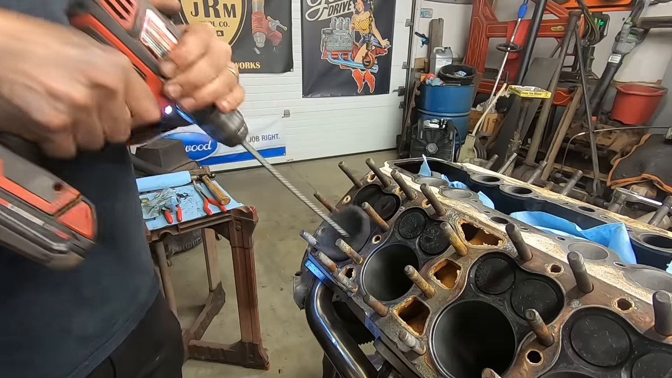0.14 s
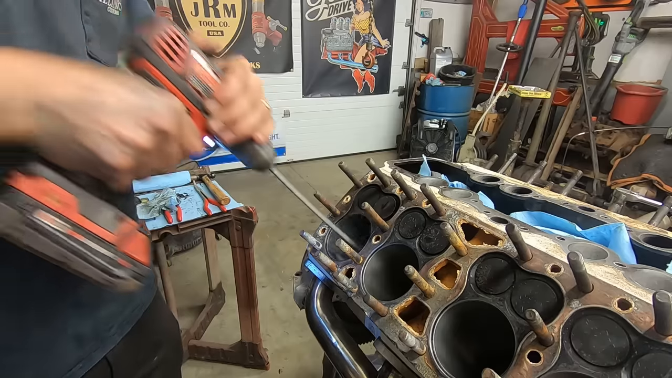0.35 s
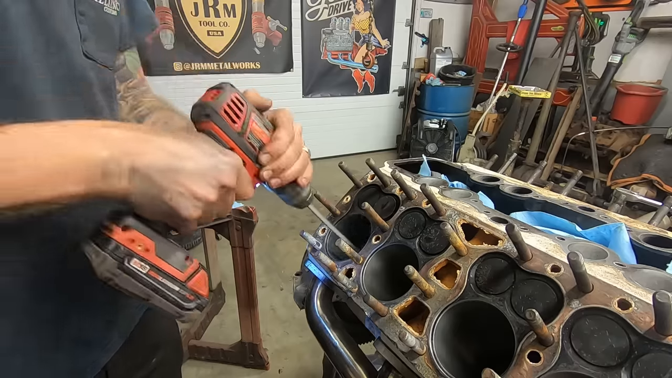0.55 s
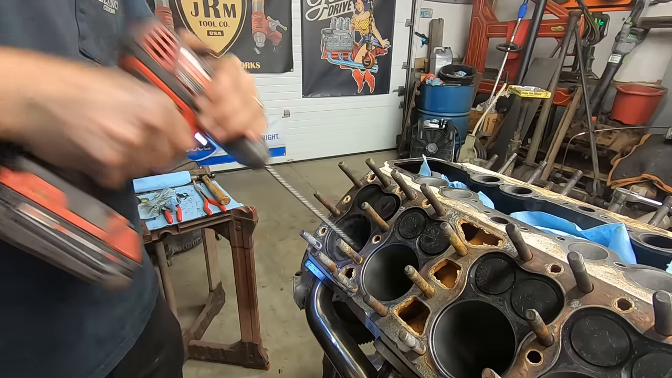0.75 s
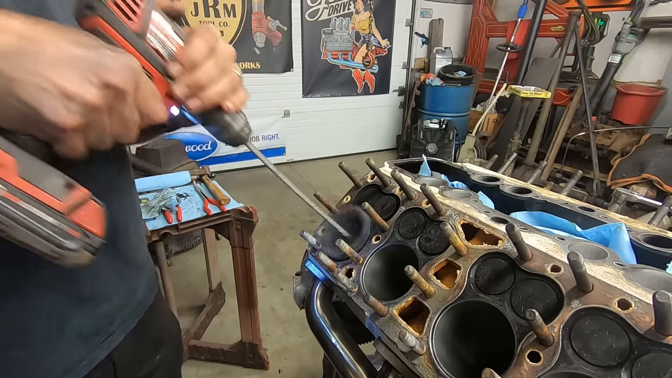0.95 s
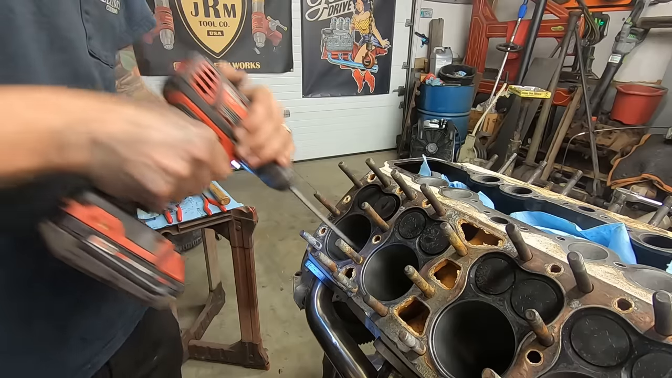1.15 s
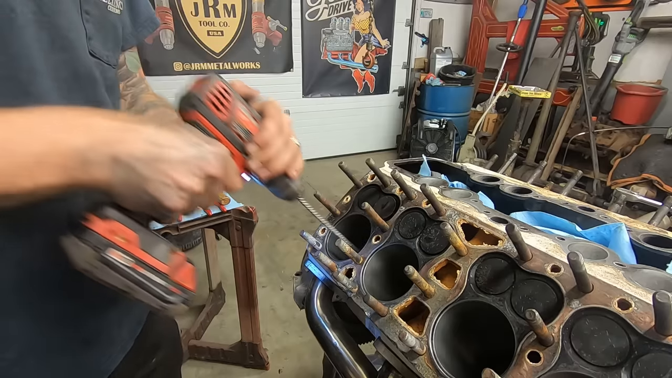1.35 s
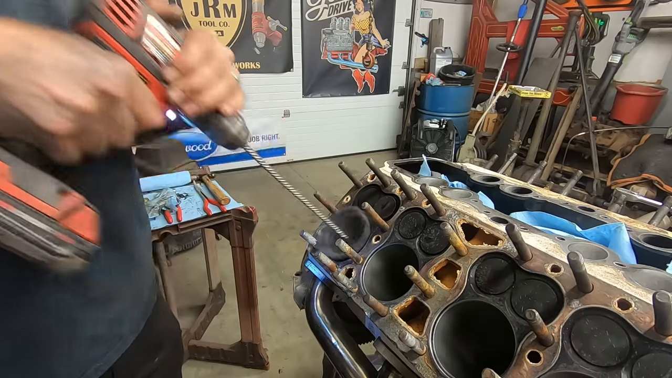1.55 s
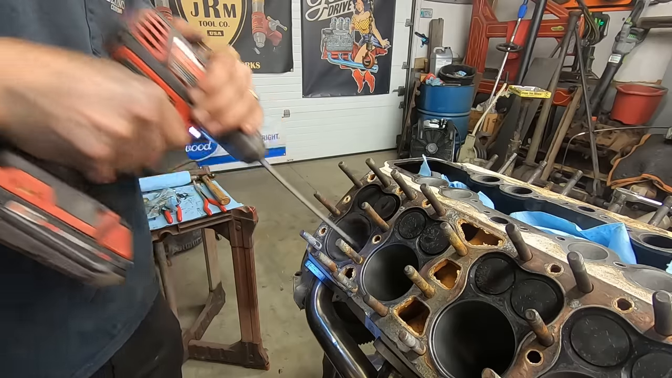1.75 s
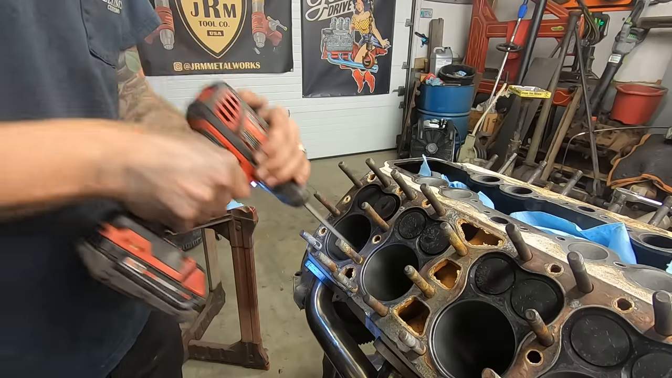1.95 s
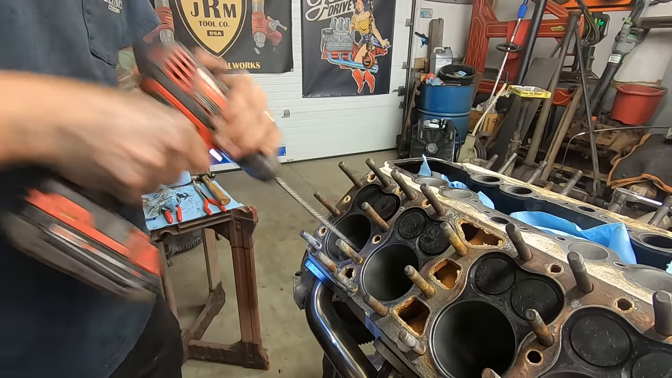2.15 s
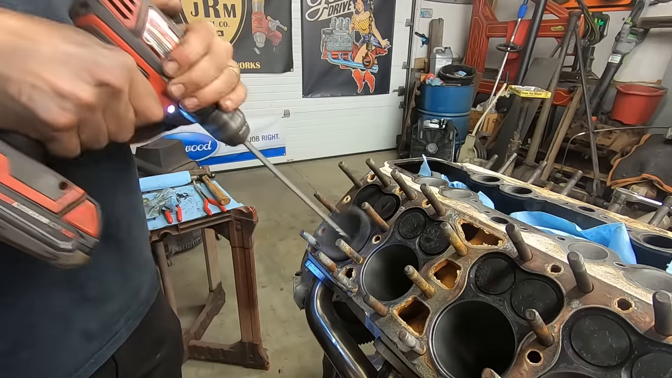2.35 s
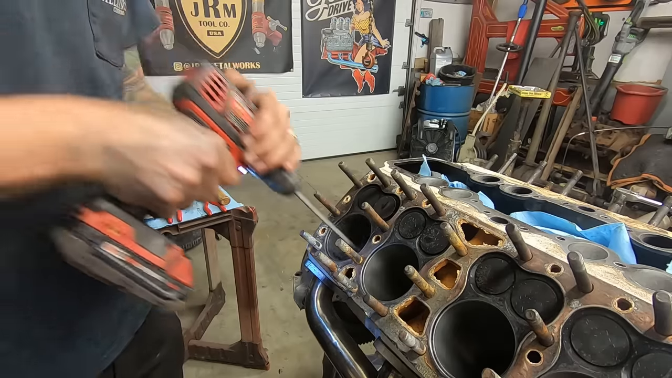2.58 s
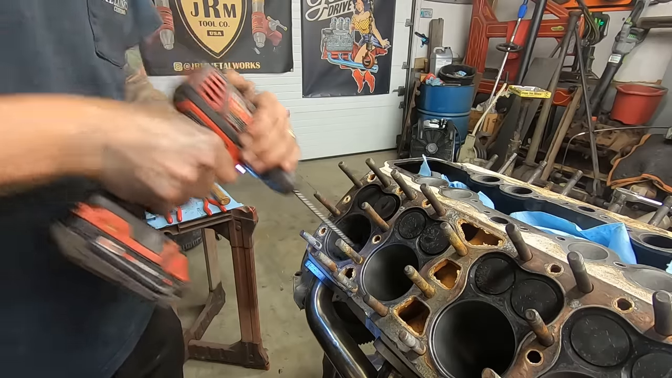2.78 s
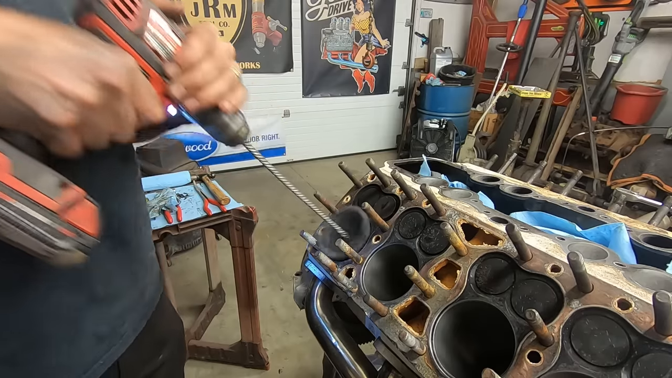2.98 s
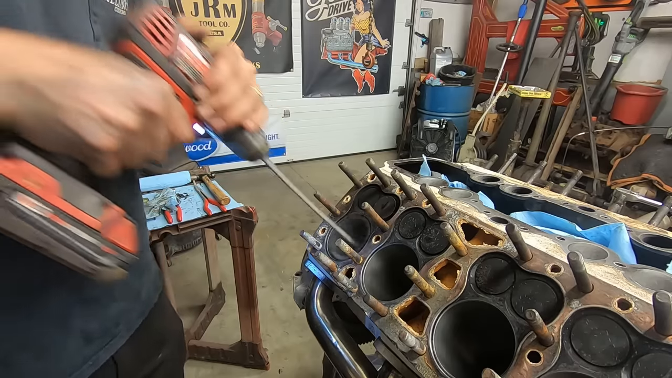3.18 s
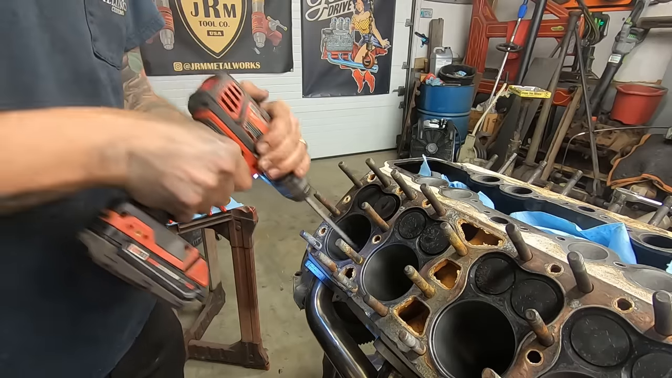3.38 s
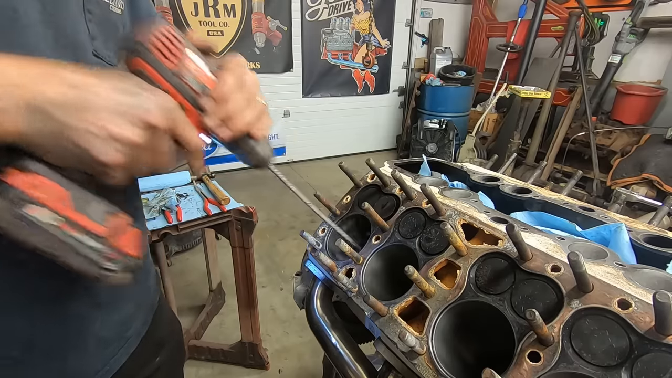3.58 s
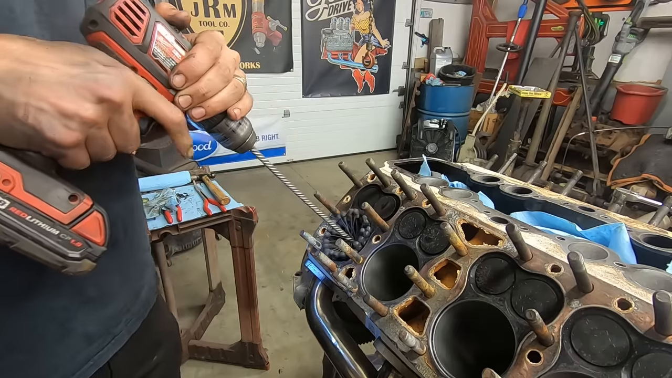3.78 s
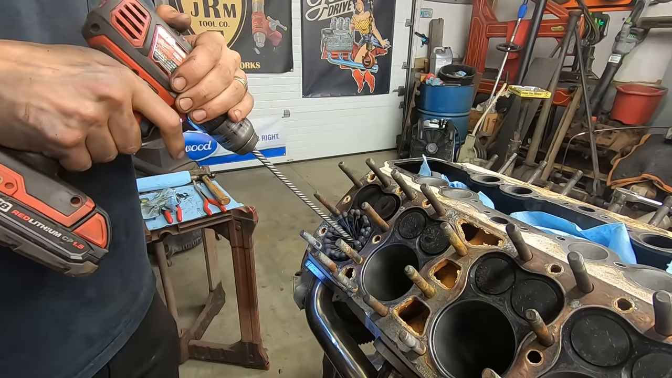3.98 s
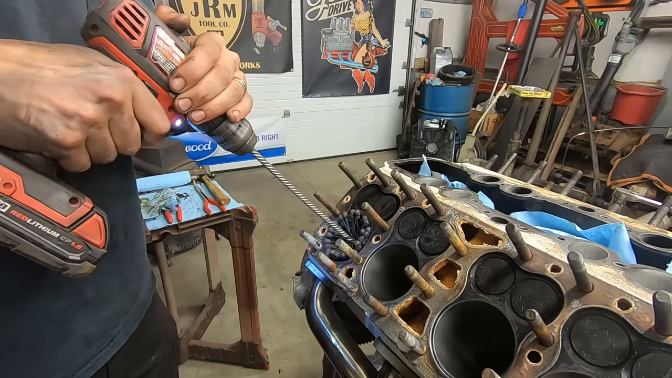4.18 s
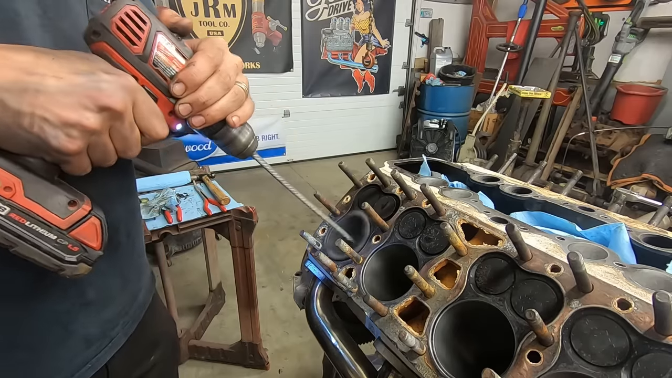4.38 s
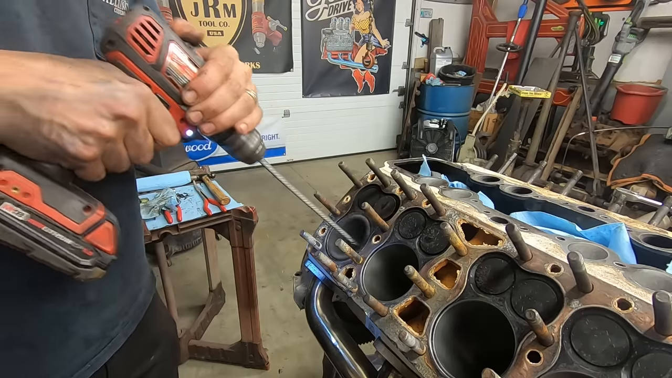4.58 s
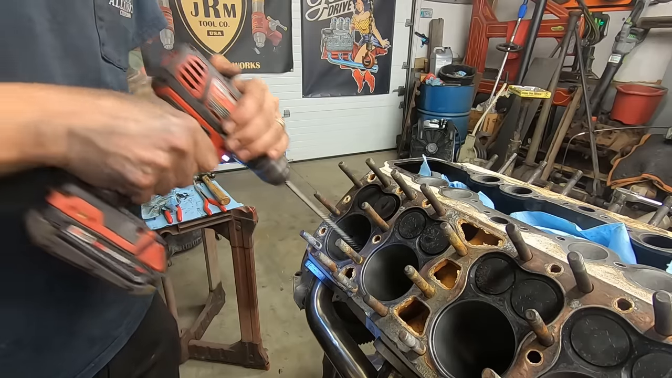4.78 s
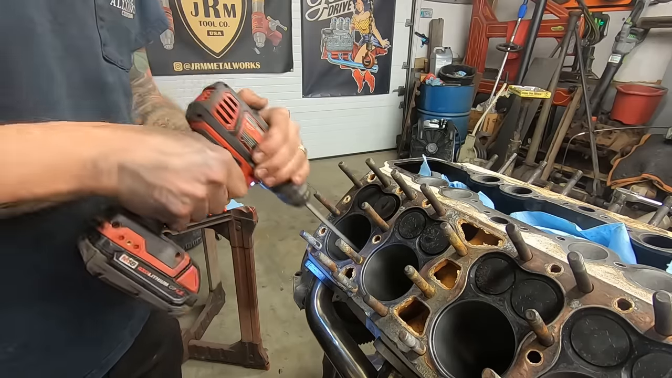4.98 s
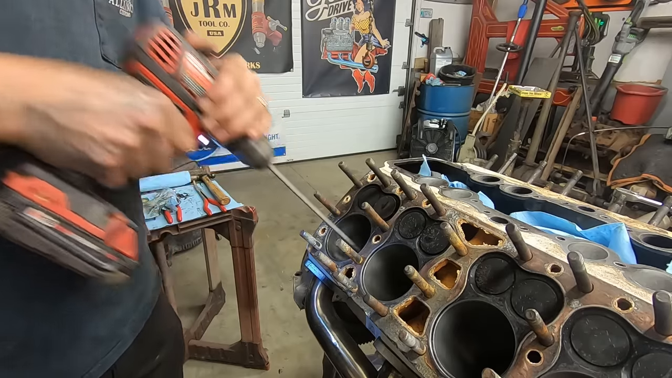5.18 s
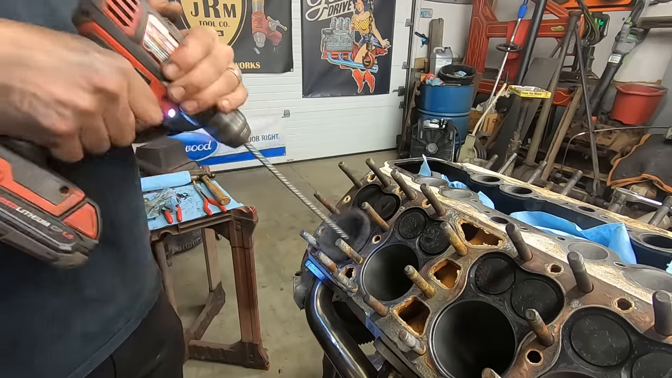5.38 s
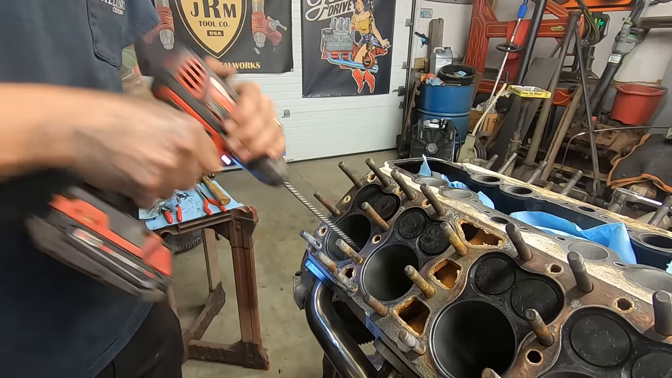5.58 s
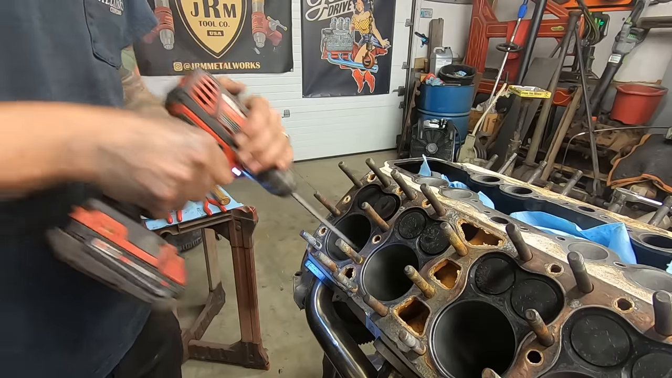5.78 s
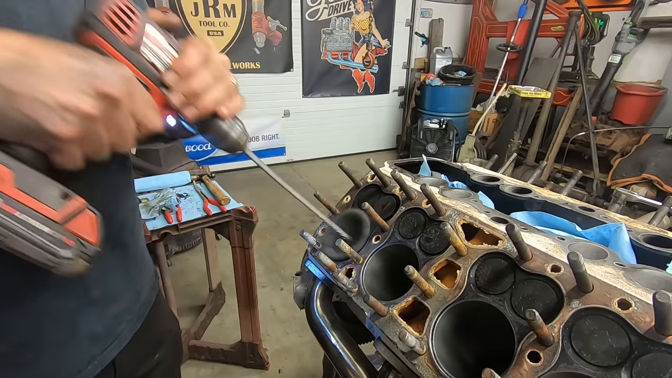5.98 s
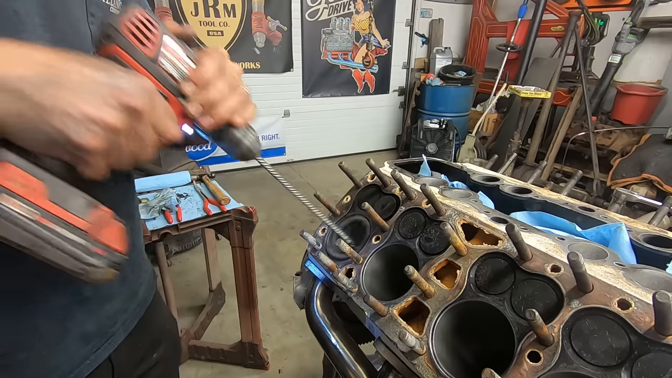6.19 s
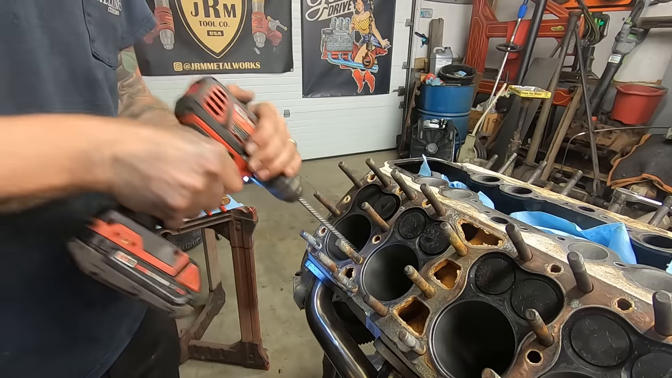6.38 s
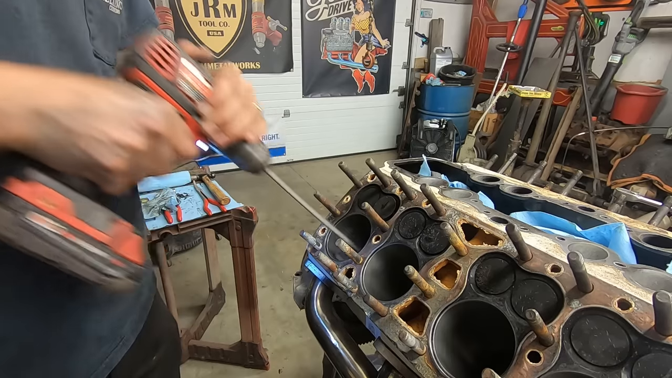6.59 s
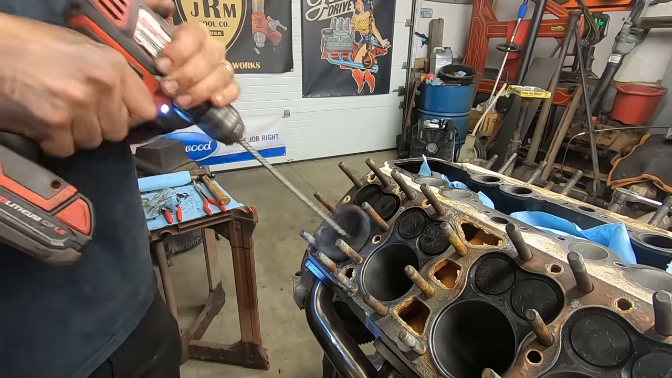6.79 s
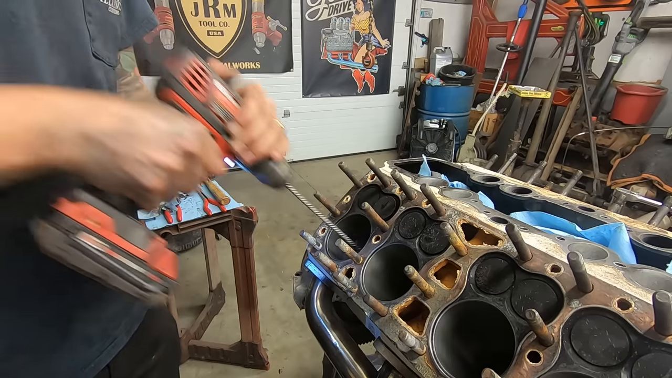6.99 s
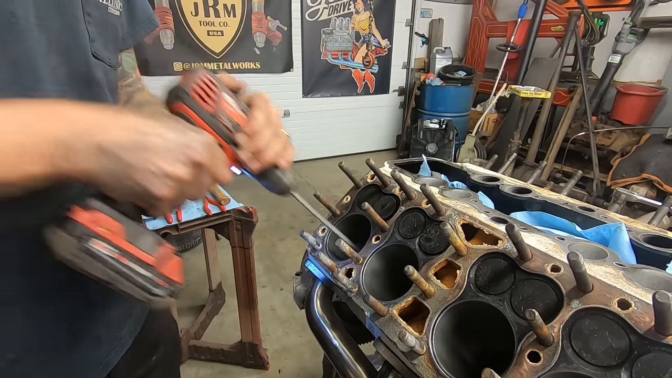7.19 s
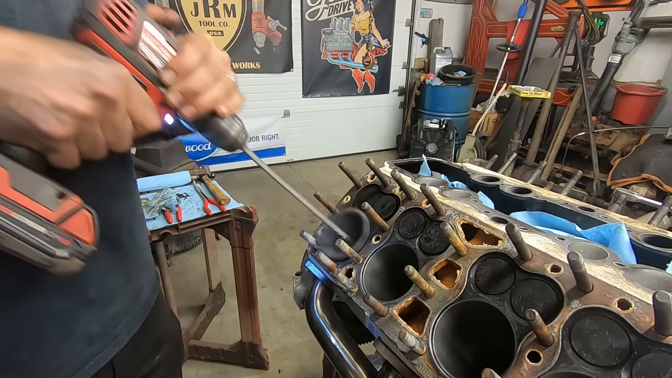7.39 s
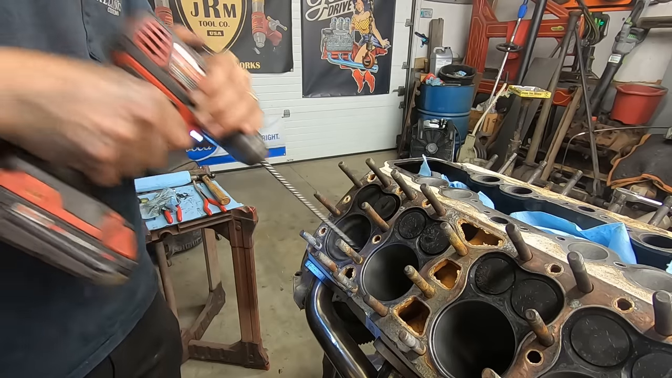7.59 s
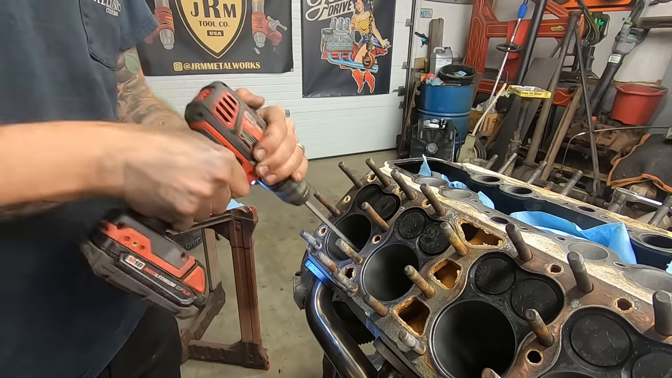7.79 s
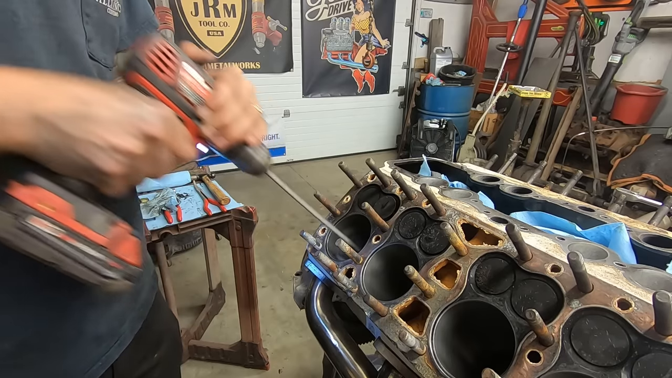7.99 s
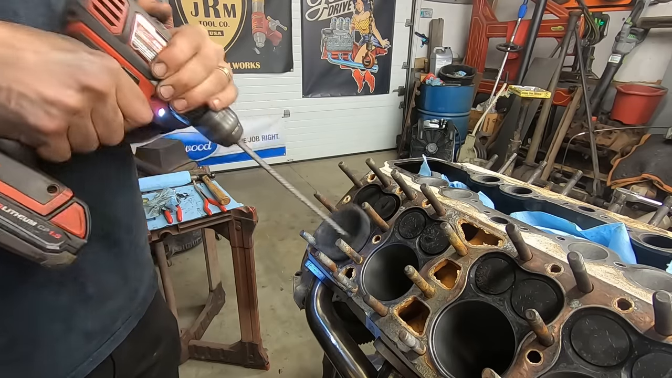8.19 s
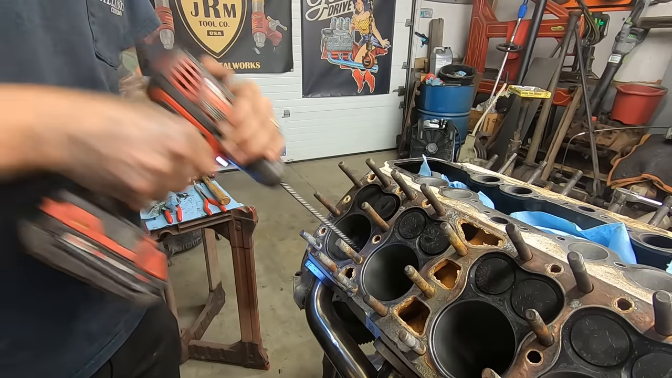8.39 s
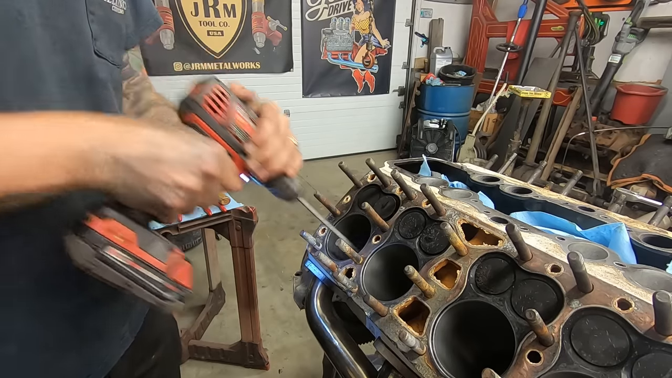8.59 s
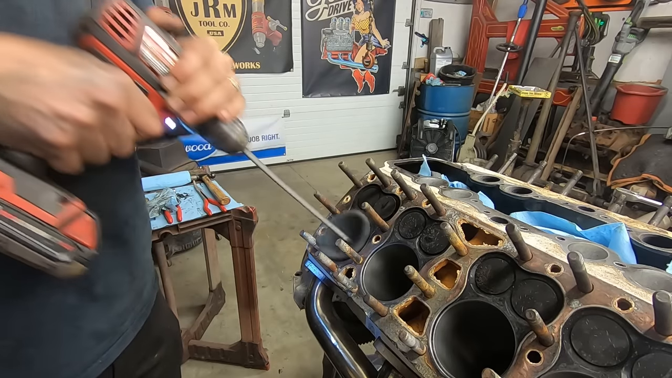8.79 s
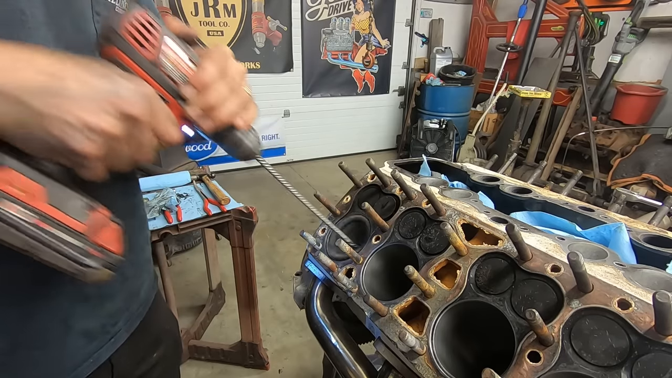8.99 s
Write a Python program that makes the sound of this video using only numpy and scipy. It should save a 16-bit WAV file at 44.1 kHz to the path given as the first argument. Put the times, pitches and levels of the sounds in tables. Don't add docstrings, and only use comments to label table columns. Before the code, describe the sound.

Close in a garage, a cordless drill is already running, its gears whining and rattling while an abrasive hone scrapes up and down an iron bore with brief high squeaks. It brakes abruptly at about 3.6 seconds, leaving low hum and hard switch clicks. At 4.4 seconds it spins up again in reverse, with ball slaps, short metallic rings and a soft low thud near 6.2 seconds.

```python
import sys
import numpy as np
from scipy import signal
from scipy.fft import rfft, irfft
from scipy.io import wavfile
from scipy.ndimage import uniform_filter1d

SR = 44100
rng = np.random.default_rng(int(sys.argv[2]) if len(sys.argv) > 2 else 0)


def gain_from_db(level_db):
    decades = np.asarray(level_db, float) / 20
    return 10 ** decades


def file_out(sig):
    cols = np.atleast_2d(sig).T
    lim = np.clip(cols, -1, 1)
    pcm = np.round(lim * 32767).astype(np.int16)
    wavfile.write(sys.argv[1], SR, pcm)


N = 399105
TIME, HZ = np.arange(N) / SR, np.fft.rfftfreq(N, 1 / SR) + 1
RATTLE_DB, RATTLE_PER_BITE = -21.5, 0.13
GRIT_DB = -14


def on_log(table):
    hz, value = np.transpose(table)
    return np.interp(np.log(HZ), np.log(hz + 1), value)


def unit(x):
    return x / np.sqrt(np.mean(x ** 2))


def colour(x, table):
    return unit(irfft(rfft(x) * gain_from_db(on_log(table)), N))


def walk(rate):
    hold = int(SR / rate)
    steps = np.repeat(rng.standard_normal(N // hold + 1), hold)
    return unit(uniform_filter1d(uniform_filter1d(steps, hold), hold)[:N])


def grains(density, spread_db):
    # (frequency [Hz], likeness [0-1])
    likeness = [(60, 0.3), (130, 0.4), (290, 0.79), (640, 0.7), (1410, 0.37), (3100, 0.97), (6820, 0.49),
                (15000, 0.05)]
    size_db = np.minimum(spread_db * rng.exponential(size=N), 8)
    hits = rng.standard_normal((2, N)) * (rng.random(N) < density / SR) * gain_from_db(size_db)
    mid, side = rfft(hits)
    alike = np.clip(on_log(likeness) + 0.033, 0, 1)
    left_right = np.array([[1], [-1]])
    return irfft(np.sqrt(1 + alike) * mid + np.sqrt(1 - alike) * side * left_right, N)


def garage_hum():
    # (frequency [Hz], level [dB per Hz])
    hum_colour = [(15, -8), (35, -4), (60, 7), (100, -20), (180, 4), (290, -24), (600, -11.5), (1500, -8.5),
                  (3000, -14), (6500, -11), (12000, -32), (15500, -55)]
    return gain_from_db(-56.5 + 1.8 * walk(3.5)) * colour(grains(SR, 0), hum_colour)


def floor_thud():
    swell = np.exp(-((TIME - 6.21) / 0.059) ** 2)
    return gain_from_db(-46) * swell * np.sin(2 * np.pi * 60 * TIME)


def room(x):
    # (frequency [Hz], time to fall 60 dB [s], level [dB])
    echo_bands = [(300, 0.77, -13.5), (1300, 0.46, -11), (3500, 0.73, -9), (6000, .8, -7.5),
                  (9000, 0.45, -6), (13000, .33, -8)]
    tail, age = 0, TIME[:SR]
    centres = [row[0] for row in echo_bands]
    for share, (hz, t60, db) in zip(np.eye(len(echo_bands)), echo_bands):
        weight = np.sqrt(on_log(np.transpose([centres, share])))
        noise = irfft(rfft(rng.standard_normal((2, N))) * weight, N)[:, :SR]
        fade = gain_from_db(-60 * age / t60) * np.clip(age / 0.029, 0, 1)
        tail = tail + gain_from_db(db) * noise * fade / np.sqrt(np.sum(fade ** 2))
    lead_in = np.concatenate([x[SR:0:-1], x])
    return signal.fftconvolve(lead_in[None], tail)[:, SR:SR + N]


def snaps(events):
    length = 8000
    out, age = np.zeros(N + length), TIME[:length]
    for s, db, hz, width_hz, t60 in events:
        edges_hz = [max(hz - width_hz / 2, 300), hz + width_hz / 2]
        band = signal.butter(3, edges_hz, "bandpass", fs=SR, output="sos")
        blow = 9.2 * (age == 0)
        burst = signal.sosfilt(band, (rng.standard_normal(length) + blow) * gain_from_db(-60 * age / t60))
        start = int(s * SR)
        out[start:start + length] += gain_from_db(db) * burst / np.abs(burst).max()
    return out[:N]


def switch_clicks():
    # (time [s], peak level [dB], centre [Hz], width [Hz], time to fall 60 dB [s])
    click_events = [(4.02, -52, 1002, 700, .02), (4.04, -59, 896, 700, .02),
                    (4.0545, -23, 6040, 3500, 0.036), (4.061, -28, 5570, 2400, .03),
                    (4.0547, -36, 10500, 6000, .03), (4.15, -29, 3500, 5500, .3),
                    (4.109, -55, 2000, 3000, 0.023), (4.135, -31, 8000, 11000, .03),
                    (4.1357, -6, 2100, 2800, 0.013), (4.137, -15, 4400, 4100, 0.013),
                    (4.142, -18.5, 2730, 4400, 0.045), (4.2978, -32, 1700, 2800, .015),
                    (4.312, -46, 2980, 3000, .015), (4.335, -48, 1800, 2500, .02),
                    (4.359, -27, 7000, 12000, .02), (4.36, -28, 3500, 5000, .12),
                    (4.393, -34, 447, 250, .06), (4.418, -30, 447, 250, .06), (4.393, -9.5, 3080, 900, .04),
                    (4.393, -20, 1170, 700, 0.029), (4.4178, -5, 3270, 2400, 0.027),
                    (4.4185, -16.5, 1240, 500, 0.038), (4.478, -16, 3000, 2000, .02),
                    (4.492, -18, 3000, 1500, .03)]
    return snaps(click_events)


def rim_slaps():
    # (time [s], peak level [dB])
    slap_events = [(1.2382, -11), (2.4686, -6.5), (3.1137, -5), (4.4521, -9), (5.5657, -7), (5.9575, -12.5),
                   (6.098, -17), (6.133, 0), (6.1674, -10), (6.213, 1), (6.2442, 0), (6.2824, 0.5),
                   (6.8951, -3.5), (7.6066, 2), (7.9908, -18)]
    return snaps([(s, db - 7, 5000, 4500, 0.015) for s, db in slap_events])


def wall_tones(events, wobble):
    out = np.zeros(N)
    drift = np.cumsum(1 + wobble * walk(200)) / SR
    for s, db, hz, length in events:
        now = slice(int(s * SR), int((s + length) * SR))
        swell = np.hanning(len(drift[now])) ** 0.31
        out[now] += gain_from_db(db - 10) * swell * np.sin(2 * np.pi * hz * drift[now])
    return out


def forward_squeaks():
    # (time [s], peak level [dB], pitch [Hz], length [s])
    squeak_events = [
        (0.996, -15, 8740, 0.027),
        (1.0675, -14, 8740, 0.03),
        (1.749, -10, 8800, 0.022),
        (3.172, -7, 8840, 0.025),
        (3.2444, -22, 8830, 0.029),
    ]
    return wall_tones(squeak_events, wobble=0.016)


def reverse_rings():
    # (time [s], peak level [dB], pitch [Hz], length [s])
    ring_events = [
        (6.146, -8, 2700, 0.048),
        (6.216, -10, 2710, 0.018),
        (6.845, -7, 2697, 0.033),
        (6.9, -9, 2686, 0.039),
        (7.545, -11, 2670, 0.029),
        (7.61, -9, 2690, .03),
        (8.305, -6, 2717, 0.033),
        (8.36, -11, 2710, 0.031),
        (8.95, -12, 2696, 0.038),
        (9.005, -8, 2730, 0.029),
    ]
    return wall_tones(ring_events, wobble=0.0028)


def grit_scrape(turn, rattle_db, treble_db):
    # (frequency [Hz], level [dB per Hz])
    grit_colour = [(1500, -29), (3000, -19), (6000, 4), (8500, 4), (10500, -3.5), (12500, -4.5),
                   (14000, -9.5), (15600, -19)]
    pressure = gain_from_db(1.5 * np.cos(turn) + 1.4 * walk(18))
    scrape = colour(grains(8000, 1.8) * pressure, grit_colour)
    return gain_from_db(rattle_db - 10 + 1.16 * (treble_db + 12.5)) * scrape


def gear_rattle(sun, turn, rattle_db):
    # (frequency [Hz], level [dB per Hz])
    rattle_colour = [(60, -70), (110, -29.5), (230, -25), (340, -21.5), (680, -13), (1370, -8),
                     (1600, -8.5), (2300, -2.5), (3800, -2.5), (5900, 0), (7000, -9), (10500, -17.5),
                     (13500, -22), (15500, -48)]
    # (frequency [Hz], width [Hz], boost [dB])
    housing = [(700, 230, 4), (1280, 240, 4), (2800, 490, 1.5), (3370, 110, 2), (4400, 170, 3),
               (5100, 250, 1.5), (6030, 460, 4), (8430, 500, 5.5)]
    knock = (1 + 0.053 * np.cos(5 * sun)) * (1 + 0.021 * np.cos(sun))
    knock = knock * gain_from_db(0.5 * np.cos(turn) + 0.43 * walk(20))
    knocks = colour(grains(20000, 1.23) * knock, rattle_colour)
    ring_db = sum(db / (1 + (2 * (HZ - hz) / width_hz) ** 2) for hz, width_hz, db in housing)
    return gain_from_db(rattle_db + 1.5) * unit(irfft(rfft(knocks) * gain_from_db(ring_db), N))


def gear_whine(sun, mesh_hz, mesh_db, swell_db, rattle_db, planet_db, multiple_db, swelling):
    multiples = (1, 2, 2.87, 3, 4, 5, 6, 8, 10.5, 11, 11.25, 11.5, 12, 14.67, 15, 19, 20, 21, 22, 22.5, 24,
                 25, 30, 33.75, 35, 36, 40, 41, 42, 50)
    whine = gain_from_db(mesh_db + 1.8 * walk(30)) * np.sin(10 * sun)
    whine += gain_from_db(swell_db + 2.6 * walk(30)) * np.sin(swelling * sun)
    pull = np.clip(uniform_filter1d(np.gradient(mesh_hz) * SR / 4000, size=2000), 0, 1)
    load = gain_from_db(rattle_db + 22) * (mesh_hz / 2400) ** 4
    for multiple, db in zip(multiples, multiple_db):
        planet = 2 < multiple < 3
        waver = 2.6 if planet else 1.3 if multiple < 9 else 2.4
        tone_db = db + 8 * pull * (multiple > 9) + planet_db * planet + waver * walk(22)
        whine += load * gain_from_db(tone_db) * np.sin(multiple * sun + 0.3 * waver * walk(30))
    return np.sqrt(2) * whine


def drill(pulled, mesh_hz, mesh_db, swell_db, rattle_db, treble_db, planet_db, multiple_db, swelling):
    running = uniform_filter1d(1. * pulled, size=600, mode="nearest")
    sun = 2 * np.pi * np.cumsum(mesh_hz * (1 + 0.00202 * walk(40))) / 10 / SR
    turn = 10 * sun / 170 + 1.8 * walk(4)
    whine = gear_whine(sun, mesh_hz, mesh_db, swell_db, rattle_db, planet_db, multiple_db, swelling)
    rattle = gear_rattle(sun, turn, rattle_db)
    return running * (whine + rattle + grit_scrape(turn, rattle_db, treble_db))


def strokes(ends, lag_s, bite_s):
    s, hz, bite_db, strain_db = np.transpose(ends)
    bottom = np.arange(len(s)) % 2
    late = s + np.take(lag_s, bottom)

    def smooth(values):
        return uniform_filter1d(np.interp(TIME, late, values), size=3000, mode="nearest")

    bites = zip(s, bite_db, np.take(bite_s, bottom))
    bite = sum(db * np.exp(-((TIME - at) / length) ** 2) for at, db, length in bites)
    return smooth(hz), bite, smooth(strain_db), smooth(1 - bottom)


def forward():
    forward_db = (-60, -54, -61, -67, -64, -64, -50, -50, -44, -45, -39.5, -39.5, -47, -48, -37, -56, -39,
                  -43, -40.5, -39, -56, -39.5, -43, -45, -46, -45, -46.5, -57, -58, -57)
    # (time [s], mesh rate just after [Hz], grit bite [dB], strain on the teeth [dB])
    forward_ends = [(-.33, 2460, 7, 0), (.03, 2420, 7, -1.5), (.37, 2470, 3.5, 0), (.72, 2410, 8, -0.5),
                    (1.07, 2462, 2.5, 0.5), (1.43, 2402, 7.5, -0.5), (1.77, 2452, 5, 1),
                    (2.15, 2402, 8, -1), (2.47, 2452, 3.5, 3), (2.88, 2408, 7.5, -1.5), (3.18, 2452, 5, 3),
                    (3.55, 2415, 7, 1.5)]
    mesh_hz, bite_db, strain_db, rim = strokes(forward_ends, lag_s=(0.03, 0.0902), bite_s=(0.066, 0.091))
    brake_s, brake_hz_per_s, coast_s, stop_s = 3.638, 5400, 3.66, 3.9
    mesh_hz = np.maximum(mesh_hz - brake_hz_per_s * np.maximum(TIME - brake_s, 0), 0)
    coasting = np.maximum(TIME - coast_s, 0)
    whine_fade_db = 800 * coasting
    upstroke_db = 1.5 * np.tanh(np.gradient(rim) * SR)
    mesh_db = -29 + strain_db + upstroke_db - whine_fade_db
    third_rim_db, third_bottom_db = -37, -50
    third_db = third_bottom_db + (third_rim_db - third_bottom_db) * np.sin(np.pi / 2 * rim) - whine_fade_db
    rattle_db = RATTLE_DB + RATTLE_PER_BITE * bite_db - 114 * coasting
    treble_db = GRIT_DB + bite_db - 30 * coasting
    return drill(TIME <= stop_s, mesh_hz, mesh_db, third_db, rattle_db, treble_db,
                 planet_db=0 * rim, multiple_db=forward_db, swelling=3)


def reverse():
    reverse_db = (-56, -55.5, -47.5, -49.5, -46, -54, -49.5, -52, -55, -41.5, -34, -52, -43, -41, -35.5,
                  -47, -70, -58, -58, -48, -47, -50, -41, -53, -60, -60, -52, -66, -66, -56)
    # (time [s], mesh rate just after [Hz], grit bite [dB], strain on the teeth [dB])
    reverse_ends = [(4.8, 2395, 1, 1), (5.13, 2348, 8.1, -4), (5.53, 2394, 5.6, 1), (5.85, 2347, 3.5, -1.5),
                    (6.24, 2385, 5.64, -2.5), (6.55, 2342, 3.6, -0.5), (6.93, 2394, 5.44, 0.5),
                    (7.25, 2340, 4, 1), (7.6, 2392, 5, -2), (7.95, 2349, 4.3, 0.5), (8.33, 2383, 5.6, -1.5),
                    (8.65, 2343, 5.3, 1), (9.0, 2380, 7.2, -17)]
    mesh_hz, bite_db, strain_db, rim = strokes(reverse_ends, lag_s=(0.0403, 0.1598), bite_s=(0.08, 0.09))
    standstill_s, spin_up_s, start_s, take_up_s = 4.345, 0.066, 4.355, 0.065
    speed = 1.001 - np.exp(-np.maximum(TIME - standstill_s, 0) / spin_up_s)
    slow_db = 20 * np.log10(speed)
    seated_s, unseated_s = 4.9, 0.12
    seating_db = -5 * np.exp(-((TIME - seated_s + unseated_s) / unseated_s) ** 4)
    slack_db = -23 * np.clip(1 - (TIME - start_s) / take_up_s, 0, 1)
    mesh_db = -31 + seating_db + slack_db + 2 * slow_db
    octave_db = -28 + strain_db + 9 * slow_db
    rattle_db = RATTLE_DB + RATTLE_PER_BITE * bite_db + slack_db
    treble_db = GRIT_DB + bite_db + 1.3 * slow_db
    return drill(TIME >= start_s, mesh_hz * speed, mesh_db, octave_db, rattle_db, treble_db,
                 planet_db=10.5 * (rim - 0.5), multiple_db=reverse_db, swelling=20)


def scene():
    near = forward() + reverse()
    near += forward_squeaks() + reverse_rings() + switch_clicks() + rim_slaps()
    near = signal.sosfilt(signal.butter(4, 170, "highpass", fs=SR, output="sos"), near)
    return near + room(near.mean(axis=0)) + garage_hum() + floor_thud()


def band_limit(x):
    return signal.sosfilt(signal.butter(12, 15660, fs=SR, output="sos"), x)


def record(dry):
    # (frequency [Hz], level [dB])
    mic_colour = [(20, -20), (60, -20), (150, 1), (10700, -0.5), (11300, -7.5), (12200, -6), (14000, -8.5),
                  (16000, -7)]
    # (frequency [Hz], left minus right [dB])
    port_difference = [(60, 0.0), (110, -2.5), (200, 0.5), (380, 0), (700, 6), (1290, 5), (2380, 3.5),
                       (4400, -1.0), (8120, -3.5), (15000, -10.5)]
    lag_s = 2.7e-5
    half = gain_from_db(on_log(port_difference) / 2) * np.exp(1j * np.pi * HZ * lag_s)
    rounded = np.tanh(1.093 * dry) / 1.106
    ports = rfft(rounded) * gain_from_db(on_log(mic_colour)) * np.array([half, 1 / half])
    return band_limit(irfft(ports, N))


dry = scene()
out = record(dry)
file_out(out)
```